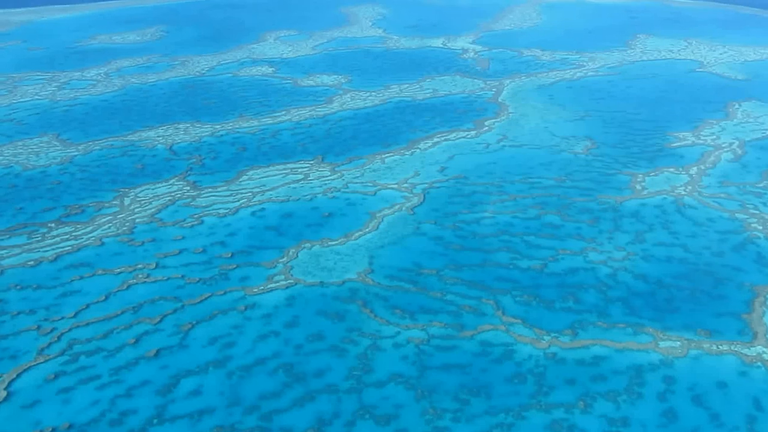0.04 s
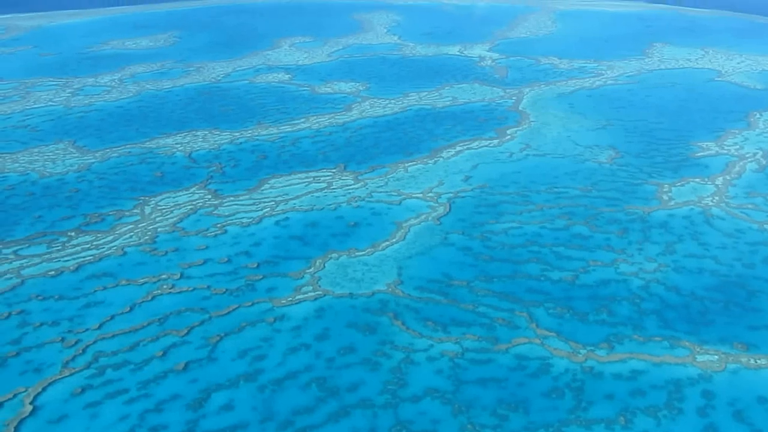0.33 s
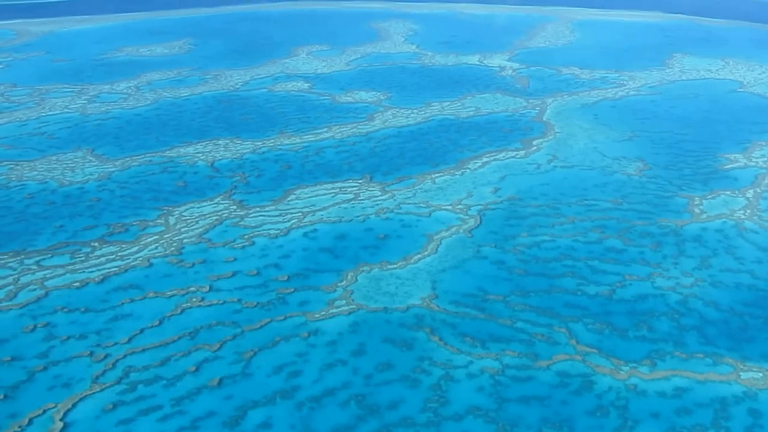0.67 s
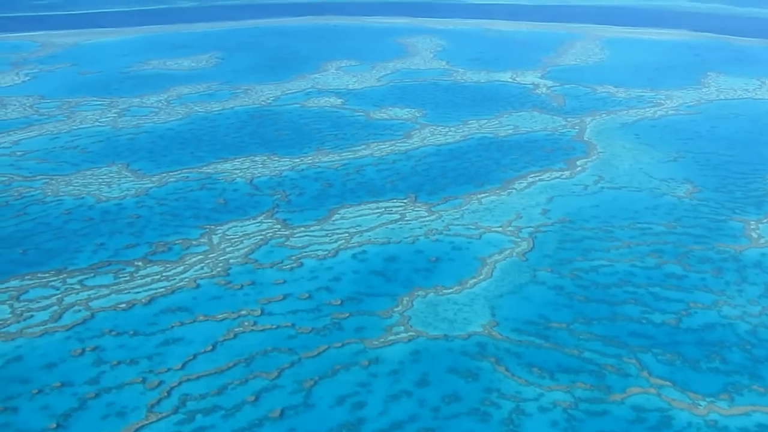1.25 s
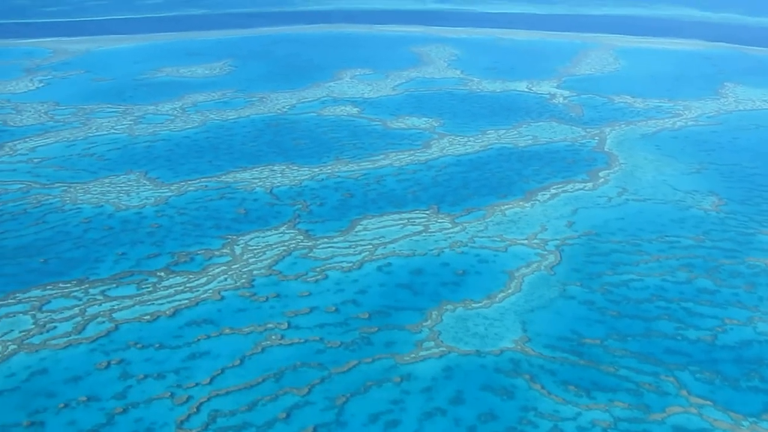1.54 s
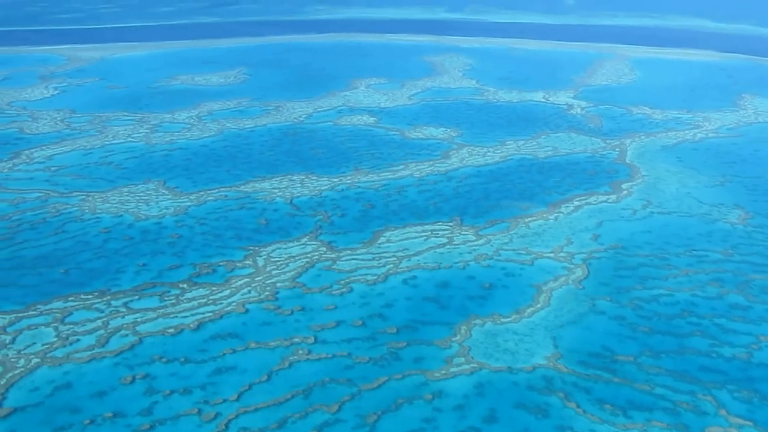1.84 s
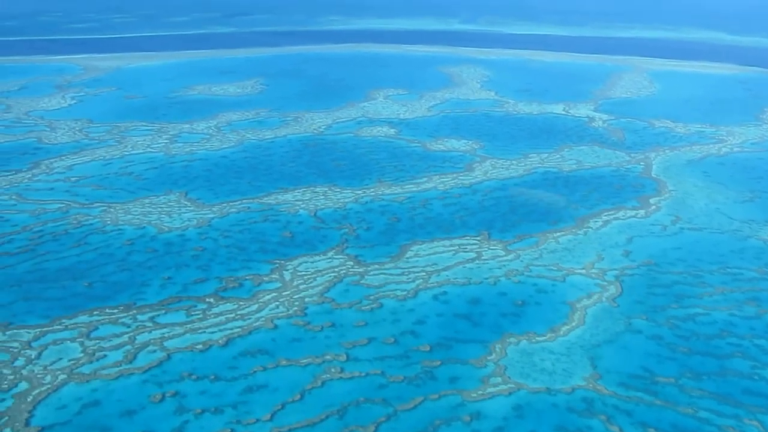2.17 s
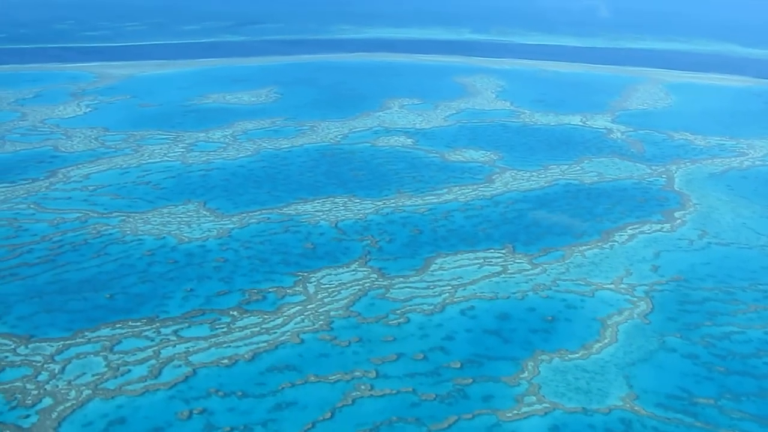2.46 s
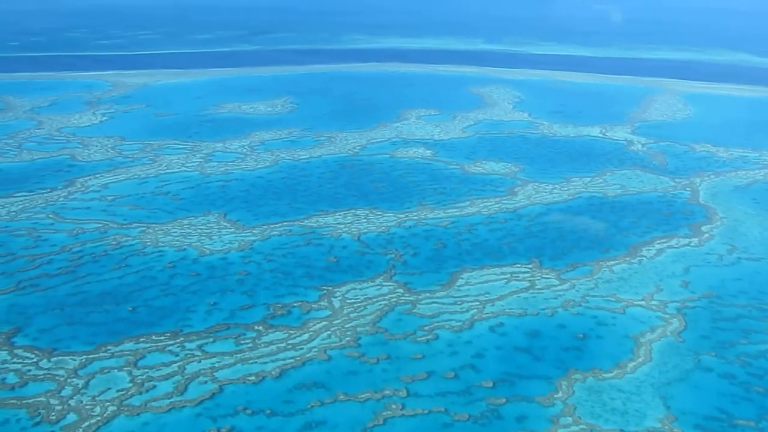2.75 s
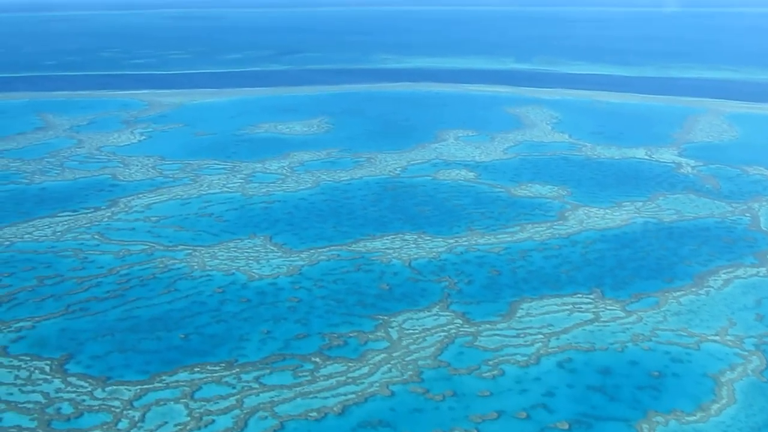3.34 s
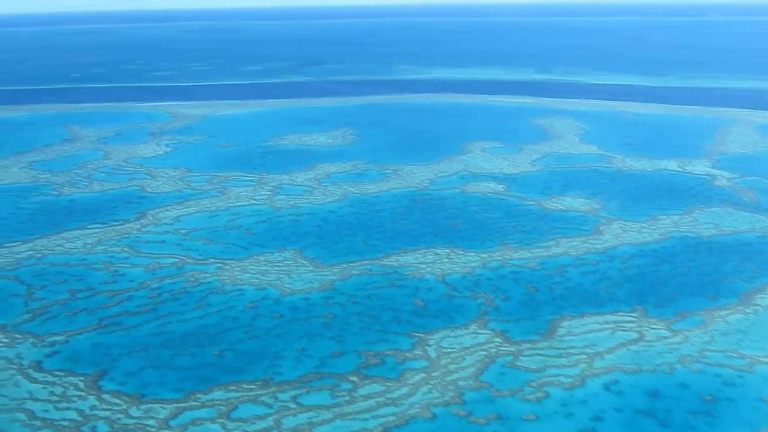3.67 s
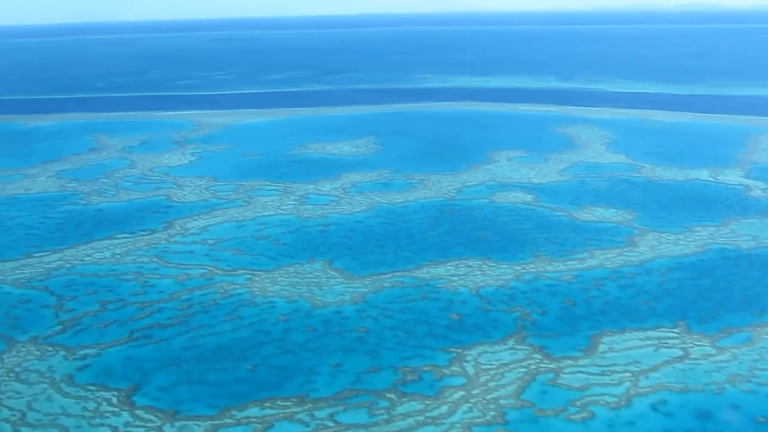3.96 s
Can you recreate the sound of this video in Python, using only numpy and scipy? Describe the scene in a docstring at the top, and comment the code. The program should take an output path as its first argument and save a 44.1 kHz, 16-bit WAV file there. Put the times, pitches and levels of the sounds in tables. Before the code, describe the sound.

A small propeller aircraft drones steadily, heard from inside the cabin as it cruises over the sea. The low, gently pulsing hum starts abruptly and continues with roaring air, hiss along the windows and a faint, thin turbine whistle.

```python
"""Cabin of a small turboprop aircraft cruising over the sea, heard from an abrupt start.
The three-bladed propeller drones, its second blade harmonic beating with a nearby hum.
The turbine and gearbox whine; the compressor whistles thinly.
The slipstream roars, booms in the cabin's low resonances and hisses along the windows."""
import sys
import numpy as np
from scipy import signal
from scipy.fft import rfft, irfft, next_fast_len
from scipy.io import wavfile
from scipy.ndimage import uniform_filter1d, minimum_filter1d, map_coordinates

SR = 44100
rng = np.random.default_rng(int(sys.argv[2]) if len(sys.argv) > 2 else 0)


def dump_mix(stems):
    """Bounce the given channels to the path in sys.argv[1] as a 16-bit WAV at rate SR."""
    frames = np.atleast_2d(stems).T  # one column per channel
    limited = np.clip(frames, -1, 1)  # hard clip at full scale
    pcm = np.round(limited * 32767).astype(np.int16)
    wavfile.write(sys.argv[1], SR, pcm)


N = 176400

PROP_HZ, PROP_DRIFT, PROP_BLADES = 28.86, 0.0012, 3  # drift: relative speed variation
TURBINE_HZ, TURBINE_DRIFT, COMPRESSOR_BLADES = 572.23, 0.00016, 16


def amp(db):
    """Decibels to gain."""
    return 10 ** (np.asarray(db) / 20)


def unit(x):
    """Scale to rms 1."""
    return x / np.sqrt(np.mean(x ** 2) + 1e-20)


def along(rows, hz):
    """Interpolate (frequency, value) rows on a log axis."""
    knots_hz, values = np.transpose(rows)
    return np.interp(np.log(hz + 1), np.log(knots_hz + 1), values)


def curve(rows):
    """One value per sample from (time, value) rows."""
    return np.interp(np.arange(N) / SR, *np.transpose(rows))


def swing_db(rows):
    """Level curve about its mean."""
    db = curve(rows)
    return db - db.mean()


def wobble(rate_hz):
    """Smooth random curve with knots at rate_hz."""
    return map_coordinates(rng.standard_normal(512), [np.arange(N) * rate_hz / SR], mode="mirror")


def filtered(x, response):
    """Zero-phase filter; response maps Hz to gain."""
    size = next_fast_len(N + SR // 2)
    return irfft(rfft(x, size) * response(np.fft.rfftfreq(size, 1 / SR)), size)[..., :N]


def band(centre_hz, width_hz):
    """Response of one resonance."""
    return lambda hz: 1 / (1 + 2 * ((hz - centre_hz) / width_hz) ** 2)


def rush(colour, patchy_db):
    """Coloured stereo noise, rms 1, with random gain patches in time and frequency."""
    # left-right likeness: (frequency [Hz], correlation [-])
    correlation = [(40, 0.93), (130, 0.93), (260, 0.9), (500, 0.73), (1000, 0.29), (1700, 0.62),
                   (2600, 0.13), (4000, 0.0048), (8000, 0.057), (12000, -0.19)]

    def mid_side_gains(hz):
        turn_rad = np.arccos(np.clip(along(correlation, hz), -1, 1)) / 2
        return colour(hz) * np.array([np.cos(turn_rad), np.sin(turn_rad)])

    spectra = signal.stft(rng.standard_normal((2, N)), nperseg=512)[2]
    patches = uniform_filter1d(rng.standard_normal(spectra.shape[1:]), size=8, axis=0)
    patches = uniform_filter1d(patches, size=10, axis=1)
    pair = signal.istft(spectra * amp(patchy_db * unit(patches)), nperseg=512)[1][:, :N]
    mid, side = filtered(pair, mid_side_gains)
    return unit(np.array([mid + side, mid - side]))


def shaft(hz, drift):
    """Angle [rad] of a slightly unsteady shaft."""
    return 2 * np.pi * np.cumsum(hz * (1 + drift * wobble(1.99))) / SR


def tone(angle, flutter_db, scatter_rad):
    """Stereo tone, rms about 1; moving air shakes its level, and its phase at each ear."""
    shake = amp(flutter_db * wobble(7.02))
    return np.sqrt(2) * shake * np.array([np.sin(angle + scatter_rad * wobble(9)) for _ in range(2)])


def propeller():
    """Shaft and blade harmonics; a hum just above the second blade harmonic beats with it."""
    # propeller tones: (multiple of shaft rate [-])
    orders = [1, 2, 3, 6, 9, 15, 20]
    # per tone: (level [dB])
    levels_db = [-60, -44, -20.5, -23, -36, -44.5, -47.5]
    beat_hz, in_phase_s, hum_db = 3.05, 2.25, -29
    angle = shaft(PROP_HZ, PROP_DRIFT)
    drone = sum(amp(db) * tone(order * angle, flutter_db=0.58, scatter_rad=0.063)
                for order, db in zip(orders, levels_db))
    beat_angle = 2 * np.pi * beat_hz * (np.arange(N) / SR - in_phase_s)
    hum = tone(2 * PROP_BLADES * angle + beat_angle, flutter_db=1.5, scatter_rad=0.23)
    return drone + amp(hum_db) * hum


def cabin_boom():
    """Turbulence keeps the cabin's low resonances ringing."""
    # cabin resonances: (frequency [Hz], width [Hz], level [dB])
    resonances = [(100.2, 14.4, -24.5), (127.1, 12, -20.5), (174, 17.4, -27), (215, 6.9, -27.5),
                  (321, 65, -28.5), (441, 16.5, -37.5), (494, 24, -37.5)]
    return sum(amp(db) * rush(band(hz, width_hz), patchy_db=0.62) for hz, width_hz, db in resonances)


def turbine():
    """Whine of low shaft harmonics and gearbox tones."""
    # turbine tones: (multiple of shaft rate [-])
    orders = [2, 3]
    # per tone: (level [dB])
    levels_db = [-54.5, -56]
    # gearbox tones: (frequency [Hz], level [dB])
    gear_tones = [(634.5, -45), (807, -51), (2738, -66.5)]
    angle = shaft(TURBINE_HZ, TURBINE_DRIFT)
    whine = sum(amp(db) * tone(order * angle, flutter_db=0, scatter_rad=0.28)
                for order, db in zip(orders, levels_db))
    gearbox = sum(amp(db) * tone(shaft(hz, PROP_DRIFT), flutter_db=2.5, scatter_rad=0.34)
                  for hz, db in gear_tones)
    return whine + gearbox


def slipstream():
    """Broad roar of turbulent air."""
    # roar spectrum: (frequency [Hz], relative density [dB])
    roar_spectrum = [(20, -45), (42, -14), (72, -13.5), (92, -5.5), (150, -1.5), (200, -3), (235, -8),
                     (370, -7), (410, -11), (540, -15), (630, -16), (730, -21), (1000, -27), (1600, -34.5),
                     (4000, -80)]
    level_db = -20 + 0.41 * wobble(15)
    return amp(level_db) * rush(lambda hz: amp(along(roar_spectrum, hz)), patchy_db=0.9)


def window_hiss():
    """Air noise along the windows; cabin reflections ripple its spectrum."""
    # hiss spectrum: (frequency [Hz], relative density [dB])
    hiss_spectrum = [(300, -19), (900, 4.5), (1300, -1), (1700, 0.5), (2300, -2.5), (2900, -2.5),
                     (3500, -7.5), (4000, -11), (4650, -8.5), (6500, -8.5), (7600, -12), (9300, -12),
                     (10800, -20), (12300, -29), (14200, -32), (15600, -40)]
    ripple_db, spacing_hz = 1.24, 70.1
    knots = rng.standard_normal(1024)

    def colour(hz):
        ripple = map_coordinates(knots, [hz / spacing_hz], mode="mirror")
        return amp(along(hiss_spectrum, hz) + ripple_db * ripple)

    level_db = -36.5 + 0.28 * wobble(25)
    return amp(level_db) * rush(colour, patchy_db=0.6)


def compressor_whistle():
    """Blade tone in a skirt of noise, with a faint side tone one propeller blade rate higher."""
    # whistle envelope: (time [s], relative level [dB])
    whistle_levels = [(0.1, -59), (0.16, -53), (0.36, -53), (0.47, -65), (0.8, -55), (1.2, -56),
                      (1.55, -60.2), (2.05, -62), (2.4, -56), (2.75, -61), (3.05, -57), (3.5, -59.5),
                      (3.75, -54), (4.0, -54)]
    gain_db, side_db, skirt_db = 1, -15, -6
    angle = COMPRESSOR_BLADES * shaft(TURBINE_HZ, TURBINE_DRIFT)
    prop_angle = PROP_BLADES * shaft(PROP_HZ, PROP_DRIFT)
    blade_tone = tone(angle, flutter_db=0, scatter_rad=0.45)
    side_tone = amp(side_db) * tone(angle + prop_angle, flutter_db=2, scatter_rad=0.6)
    skirt = amp(skirt_db) * rush(band(COMPRESSOR_BLADES * TURBINE_HZ, width_hz=90), patchy_db=-1.0)
    return amp(curve(whistle_levels) + gain_db) * (blade_tone + side_tone + skirt)


def limiter(x, ceiling=0.7, hold_s=0.04):
    """One gain for both channels keeps peaks under the ceiling."""
    hold = int(hold_s * SR)
    needed_gain = np.minimum(1, ceiling / (np.abs(x).max(axis=0) + 1e-9))
    return x * uniform_filter1d(minimum_filter1d(needed_gain, hold), hold)


def scene():
    """Whine, roar and hiss step down in the first second as the recorder's gain settles,
    then waver gently; the bass swells on its own."""
    # overall level of whine, roar and hiss: (time [s], relative level [dB])
    overall_levels = [(0.1, -34), (0.15, -30), (0.19, -33.5), (0.38, -32), (0.43, -34), (0.66, -34),
                      (0.85, -37), (1.15, -36), (1.4, -37.5), (2.15, -37.0), (2.65, -35), (2.8, -36.1),
                      (3.05, -34.5), (3.35, -37), (3.75, -36.1), (4.0, -38.5)]
    # propeller and boom envelope: (time [s], relative level [dB])
    bass_levels = [(0.1, -14.5), (0.42, -12), (0.9, -15.5), (1.15, -13.5), (1.38, -16.5), (1.95, -13.5),
                   (2.1, -15.5), (2.25, -13.7), (2.42, -16.5), (2.62, -12.4), (2.9, -14.5), (3.2, -13.5),
                   (3.33, -17), (3.58, -13), (4.0, -17)]
    overall_db = swing_db(overall_levels)
    bass = amp(swing_db(bass_levels)) * (propeller() + cabin_boom())
    whine_and_roar = amp(0.86 * overall_db) * (turbine() + slipstream())
    hiss = amp(overall_db) * window_hiss()
    return bass + whine_and_roar + hiss + compressor_whistle()


def record(dry):
    """Two microphones of slightly unequal colour cut in abruptly; then limiter and band limit."""
    # channel balance: (frequency [Hz], left over right [dB])
    balance = [(60, 0), (140, 1.75), (260, 2), (500, 0), (1000, 2.5), (2000, 0.6), (4000, 0), (8000, -1),
               (12000, -1)]
    start_s, fade_in_s, top_hz = 0.086, 0.0069, 15700
    heard = filtered(dry, lambda hz: amp(along(balance, hz) * np.array([[0.5], [-0.5]])))
    opening = np.clip((np.arange(N) / SR - start_s) / fade_in_s, 0, 1)
    return filtered(limiter(heard * opening), lambda hz: hz < top_hz)


dry = scene()
out = record(dry)
dump_mix(out)
```